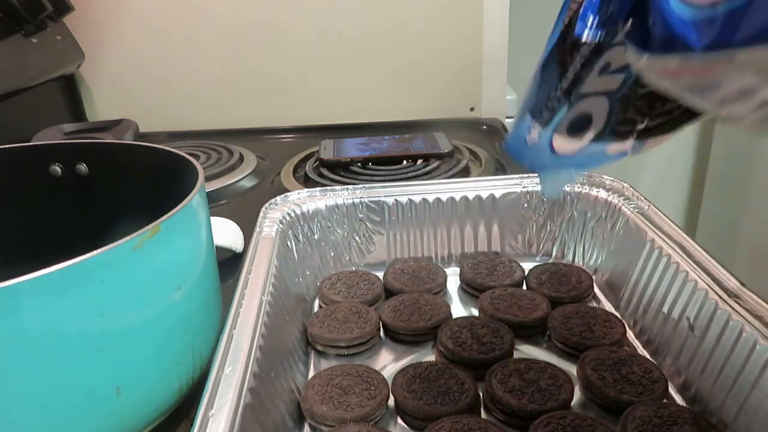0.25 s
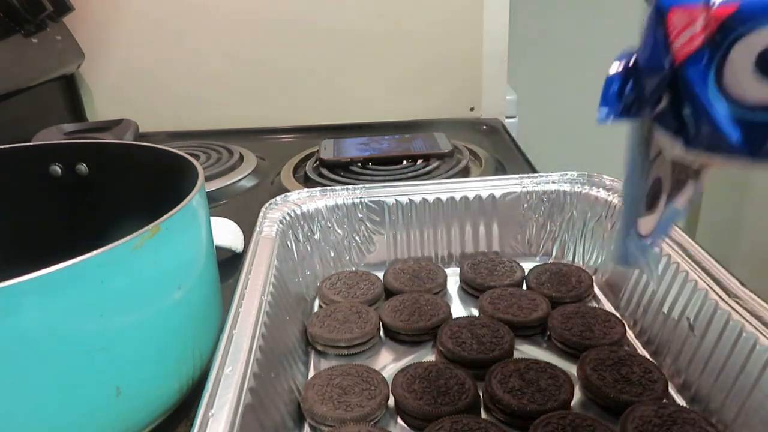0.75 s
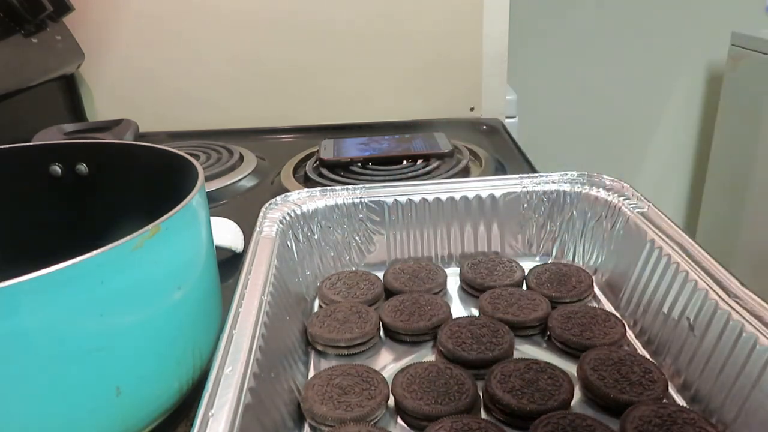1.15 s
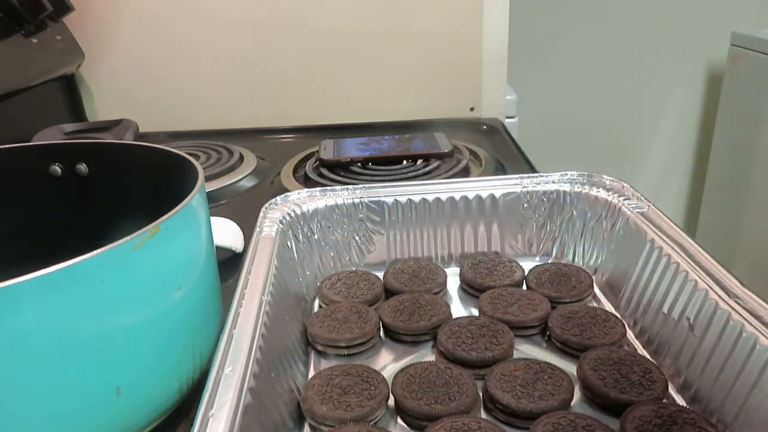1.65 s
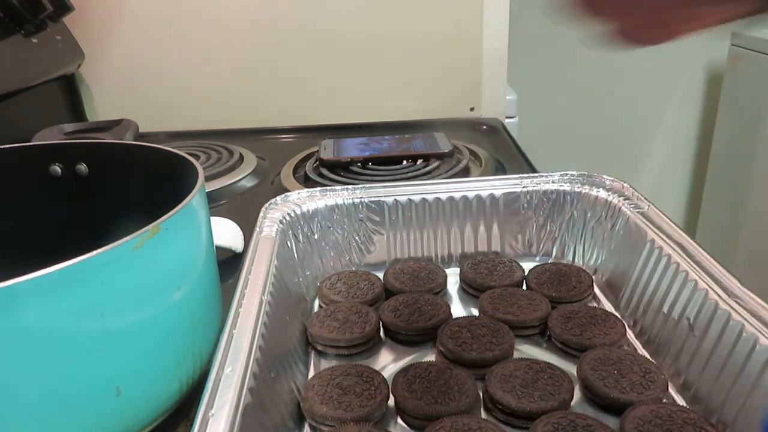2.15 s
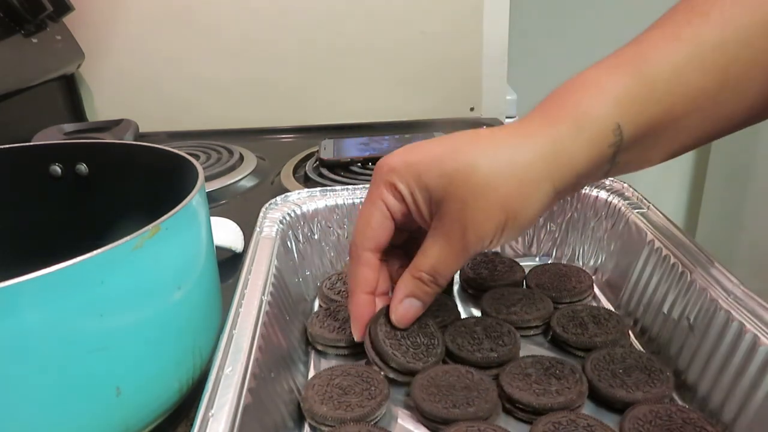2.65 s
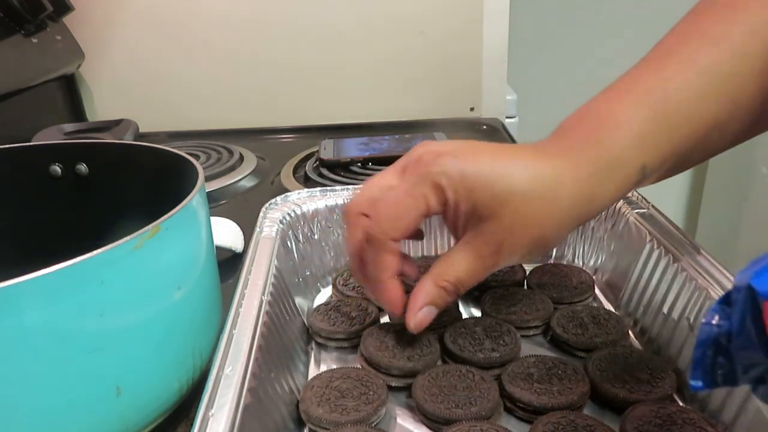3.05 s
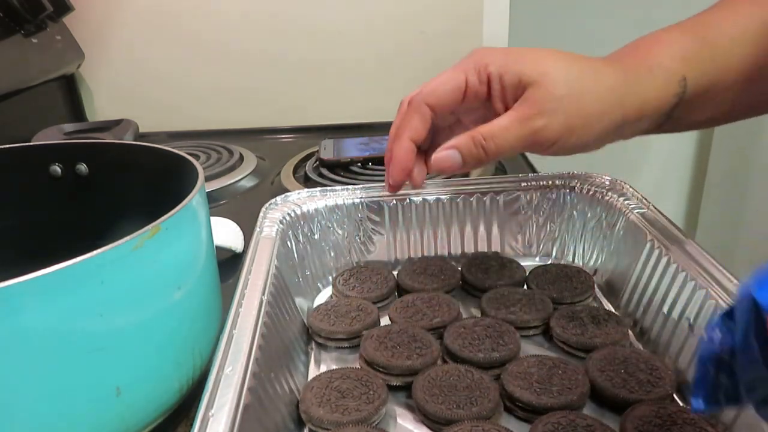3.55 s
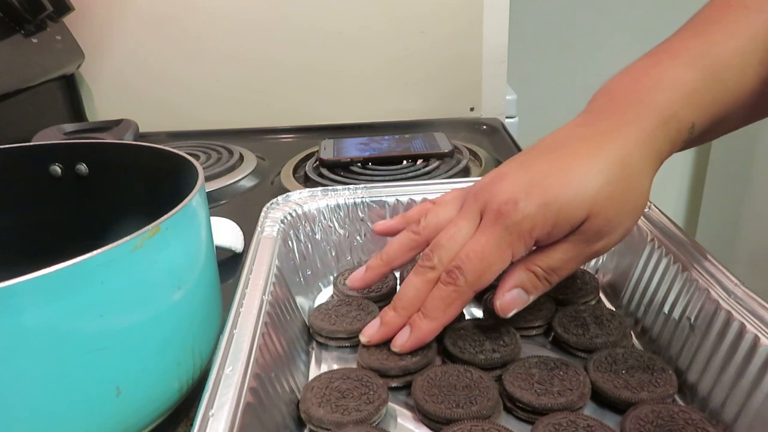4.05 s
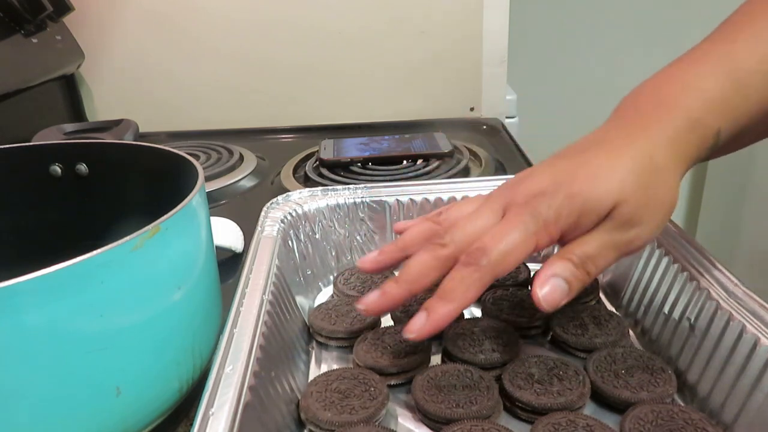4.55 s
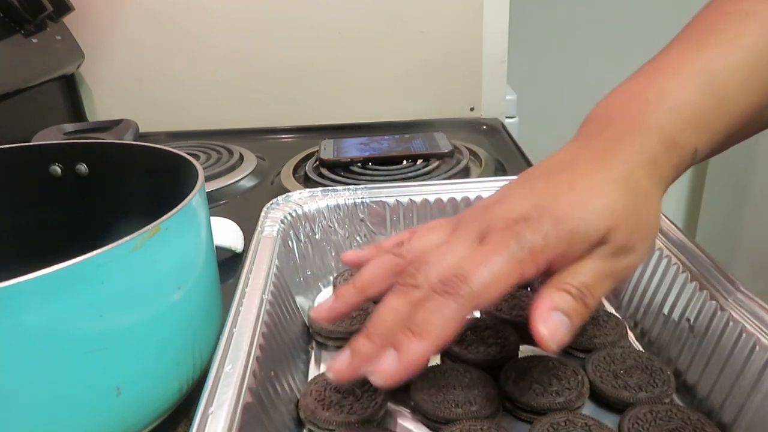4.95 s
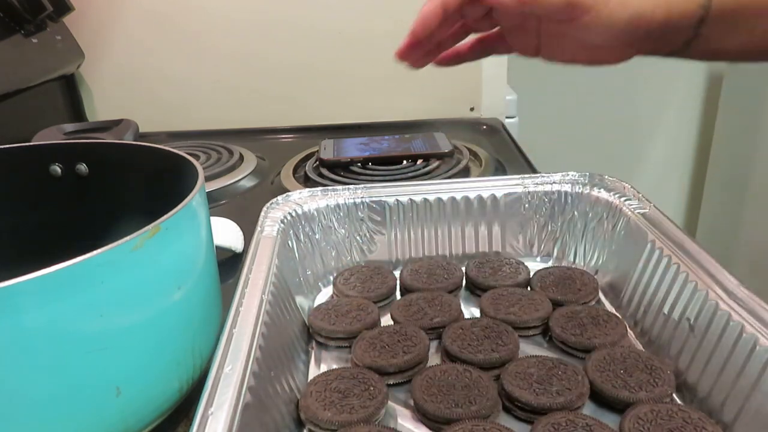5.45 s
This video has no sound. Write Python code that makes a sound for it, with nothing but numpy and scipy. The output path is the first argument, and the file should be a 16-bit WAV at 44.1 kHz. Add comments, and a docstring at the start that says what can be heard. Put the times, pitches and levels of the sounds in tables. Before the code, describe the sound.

A plastic wrapper crinkles and snaps loudly, then small hard cookies tap and scrape in a thin foil pan, with one strong slap.

```python
"""A plastic cookie package is crumpled and rummaged slightly to the right, then a hand sets cookies into a foil pan,
slides them and pats them down. Package: random clicks ring half-octave bands, plus single loud creases.
Pan: blows ring its modes under a foil rattle; drags are dense stick-slip clicks, partly through the same modes.
Dull bumps come through the counter; a short room and appliance rumble with hum and hiss lie behind."""
import sys
import numpy as np
from scipy import signal
from scipy.fft import rfft, irfft
from scipy.io import wavfile
from scipy.ndimage import uniform_filter1d

SR = 44100
rng = np.random.default_rng(int(sys.argv[2]) if len(sys.argv) > 2 else 0)


def materialize(psi):
    """Save the field psi as 16-bit PCM at rate SR to the path in sys.argv[1].

    A 1-D psi becomes a single channel; in a 2-D psi each row is a channel.
    """
    bounded = np.clip(np.atleast_2d(psi).T, -1, 1)
    quanta = np.round(bounded * 32767).astype(np.int16)
    wavfile.write(sys.argv[1], SR, quanta)


N = 252018

# handling of the package: time_s, crackle_gain_db, treble_over_crackle_db
CRUMPLE_ROWS = [(0.05, -64.5, -11), (0.33, -42, -6.5), (0.56, -52.5, -9.5), (0.72, -46.5, -17),
                (0.77, -39.5, -7), (0.9, -40.5, -10.5), (0.97, -28, -10.5), (1.09, -23, -8.5),
                (1.2, -30.5, -8), (1.28, -30.5, -10.5), (1.48, -22.5, -12), (1.6, -34, -11.5),
                (1.67, -27.5, -11), (1.74, -24.5, -11), (1.8, -32, -20), (1.9, -22, -16),
                (2.02, -25.5, -16.5), (2.13, -27, -18), (2.2, -34.5, -14.5), (2.37, -38.5, -15),
                (2.55, -63, -18)]
# film crackle spectrum: freq_hz, density_db_per_hz
FILM_SPECTRUM = [(120, -17), (200, -6.5), (538, -6), (601, -2), (671, -10.5), (735, 0), (851, -7),
                 (1210, -3), (2050, -2.5), (7270, -26), (13100, -16.5), (16000, -83)]
# single loud creases: start_s, ring_gain_db, ring_hz, treble_over_ring_db, shake_t60_s
CREASES = [(0.148, -39, 1360, -30, 0.035), (0.233, -35, 754, -17, 0.038), (0.264, -30.5, 1900, -28, 0.072),
           (0.316, -34, 2200, -17, 0.04), (0.345, -27, 1400, -26, 0.053), (0.352, -30, 650, -26, 0.045),
           (0.361, -25.5, 1620, -27, 0.2), (0.412, -26, 1650, -27, 0.043), (0.462, -35.5, 1450, -22, 0.15),
           (0.62, -38.5, 2800, -20, 0.05), (0.64, -33.5, 1810, -24, 0.035),
           (0.674, -24.5, 2300, -3.5, 0.027), (0.763, -32, 2830, 0, 0.021), (0.78, -30, 1900, -16, 0.03),
           (0.816, -32.5, 2700, -24, 0.11), (0.858, -20, 1770, -27, 0.019), (0.887, -20, 1330, -19, 0.018),
           (0.926, -24.5, 1810, -1.5, 0.041), (0.955, -17, 1860, -3, 0.031),
           (0.973, -11.5, 2210, -25, 0.04), (1.003, -28, 1980, -30, 0.041), (1.034, -9.5, 1540, -28, 0.03),
           (1.07, -14.5, 2300, -24, 0.076), (1.085, -15, 1680, -24, 0.054),
           (1.098, -12.5, 2400, -22, 0.071), (1.129, -16, 1290, -19, 0.035),
           (1.151, -9.5, 2460, -1.5, 0.016), (1.167, -17, 2500, -22, 0.03), (1.188, -18, 2120, -26, 0.015),
           (1.207, -5.5, 2530, -7, 0.005), (1.255, -14, 1150, -32, 0.027), (1.292, -27, 1530, 5.5, 0.051),
           (1.304, -16, 1800, -32, 0.051), (1.347, -16, 2050, -30, 0.047), (1.366, -13.5, 1580, -28, 0.038),
           (1.388, -9.5, 1530, -34, 0.027), (1.402, -8.5, 1290, -29, 0.059),
           (1.427, -9.5, 1430, -30, 0.071), (1.493, -8.5, 2140, -22, 0.098), (1.496, -9, 790, -30, 0.045),
           (1.538, -7.5, 1800, -19, 0.056), (1.583, -22, 1780, -26, 0.055),
           (1.607, -21.5, 1880, -27, 0.081), (1.631, -19.5, 1640, -21, 0.067),
           (1.68, -16.5, 1480, -29, 0.029), (1.697, -14, 1290, -32, 0.054),
           (1.735, -18.5, 2600, -22, 0.055), (1.778, -23, 1690, -28, 0.03), (1.815, -23, 1380, -24, 0.082),
           (1.831, -24, 2080, -28, 0.1), (1.862, -16, 1170, -30, 0.097), (1.877, -12.5, 1160, -14, 0.036),
           (1.901, -9, 2030, -3.5, 0.098), (1.914, -4.5, 1170, -33, 0.028),
           (1.972, -16.5, 1020, -27, 0.082), (1.997, -16.5, 970, -15, 0.064),
           (2.022, -18, 1200, -25, 0.045), (2.05, -19, 1040, -29, 0.05), (2.117, -13, 1590, -22, 0.034),
           (2.126, -13.5, 2900, 3, 0.074), (2.211, -21.5, 1500, -34, 0.084), (2.262, -27, 1530, -25, 0.058),
           (2.302, -19.5, 1240, -27.5, 0.21), (2.316, -20, 750, -30, 0.043), (2.36, -21, 940, -33, 0.16),
           (2.459, -29.5, 1010, -35, 0.063)]
CRUMPLE_TRIM_DB = -4.0
FLIP_AMP = 3.5  # crease flip, against rattle noise of RMS 1


def package():
    """Film creases buckle: dense crackle follows the hand, single creases flip and rattle, at two package ends."""
    gain_db, treble_db = curves(CRUMPLE_ROWS)
    gain = undb(gain_db + CRUMPLE_TRIM_DB)
    ends = np.zeros((2, N))
    for end in ends:
        _, mid, high = crackle(FILM_SPECTRUM, 110, 260, 2.3, 0.63, low_hz=0, high_hz=5000)
        end += gain * (unit(mid) + undb(treble_db) * unit(high))
    n = 3000
    for start_s, ring_db, ring_hz, treble_db, t60_s in CREASES:
        shake = rng.standard_normal(n) * fading(n, t60_s)
        shake[0] += FLIP_AMP  # the crease flips at once, the film rattles after
        ring = band(shake, ring_hz, 1.02 * ring_hz, order=2)
        tick = band(shake * fading(n, 0.0098), 9300, 10000)
        snap = crest(ring) + undb(treble_db) * crest(tick)
        add(ends[rng.integers(2)], start_s, undb(ring_db) * snap)
    return ends


# cookies and fingers landing in the pan: start_s, upper_gain_db, body_over_upper_db, treble_over_upper_db,
# rattle_t60_s, favoured_low_mode_hz, rise_s
LANDINGS = [(2.598, -7, -0.5, -32, 0.12, 396, 0.001), (2.76, -22, 5, -28, 0.03, 330, 0.0027),
            (2.774, -20, 4, -28, 0.04, 380, 0.003), (2.85, -22.5, -27, -4.5, 0.089, 330, 0.0012),
            (2.904, -11.5, -19, -10, 0.022, 430, 0.00097), (2.995, -27.5, -12, 3, 0.14, 322, 0.0014),
            (3.038, -9, 0.5, -24, 0.13, 440, 0.003), (3.047, -12, -1, -27, 0.11, 255, 0.001),
            (3.08, -20, -16, -26, 0.036, 476, 0.0018), (3.245, -15.5, 0, -18, 0.061, 397, 0.0054),
            (3.38, -14, -18, -32, 0.13, 393, 0.0076), (3.391, -12.5, 3.5, -33, 0.14, 382, 0.00073),
            (3.621, -34, -2, -24, 0.066, 315, 0.001), (3.978, -13, 3, -32, 0.03, 290, 0.006),
            (3.9926, 1, -9, -31, 0.07, 520, 0.00098), (4.132, -27, -25, -32, 0.078, 608, 0.0008),
            (4.537, -37.5, 3, -37, 0.14, 300, 0.0011), (4.871, -15, -11, -24.5, 0.14, 293, 0.0054),
            (4.884, -16.5, -5, -25, 0.05, 344, 0.00314), (5.001, -18, -1.5, -37.5, 0.21, 400, 0.0016),
            (5.065, -29, 7.5, -32, 0.098, 670, 0.0048), (5.107, -18, 1, -42, 0.093, 405, 0.0015),
            (5.176, -28, 4.5, -19, 0.21, 660, 0.0038), (5.218, -14.5, -1.5, -30, 0.32, 405, 0.001),
            (5.246, -21.5, 2.5, -26, 0.15, 396, 0.0028), (5.29, -28, 7, -11, 0.064, 660, 0.0033),
            (5.333, -15, 0, -47, 0.088, 400, 0.00117), (5.429, -21, -22, -18.5, 0.053, 620, 0.00075),
            (5.531, -25, -20, -23, 0.23, 570, 0.003), (5.594, -22, 5.5, -43, 0.089, 353, 0.00098),
            (5.689, -33, -22, -34, 0.15, 464, 0.002)]
# modes of the loaded pan, before damping or widening: mode_hz, gain_db, t60_s
PAN_MODES = [(256, -2, .08), (360, -2, .09), (405, 0, .14), (480, -6, .07), (580, -1, .09), (660, -3, .11),
             (760, -8, .06), (905, -6, .06), (1040, -5, .06), (1245, -4, .06), (1400, 0, .06),
             (1650, 0, .06), (1900, -5, .05), (2105, -1, .05), (2360, -5, .05), (2770, -13, .04),
             (3250, -17, .04)]
BRIGHT_HZ, BRIGHT_OCT_PER_DB = 1650, 0.08  # favoured upper pitch at 0 dB; softer blows are duller


def tapping():
    """Each landing is a blow that rings the pan's modes, a rattle of foil and a crack on top."""
    out, n = np.zeros(N), 6000
    pan_hz = np.array(PAN_MODES)[:, 0]
    deep = pan_hz < 700
    for start_s, upper_db, body_db, treble_db, t60_s, low_hz, rise_s in LANDINGS:
        contact = 1 - np.exp(-np.arange(1, n + 1) / SR / max(rise_s, 1e-4))  # a soft landing builds up
        high_hz = BRIGHT_HZ * 2 ** (BRIGHT_OCT_PER_DB * upper_db)
        blow = 0.35 * rng.standard_normal(n) * fading(n, 0.13 * t60_s) * contact
        blow[int(rise_s * SR)] += 3.0
        blow = band(blow, 800, 1330)

        # the spot struck favours the modes near two pitches
        octaves_off = abs(np.log2(pan_hz / np.where(deep, low_hz, high_hz)))
        loss_db_per_oct = np.where(deep, 32, 7)
        spot_db = -octaves_off * loss_db_per_oct + 2.3 * rng.standard_normal(len(PAN_MODES))
        modes = []
        for mode_spot_db, (hz, mode_db, mode_t60_s) in zip(spot_db, PAN_MODES):
            ring = unit(band(blow, hz, np.log(1000) / np.pi / mode_t60_s))
            modes.append(rng.choice([-1, 1]) * undb(mode_db + mode_spot_db) * ring)
        modes = np.array(modes) * fading(n, 5.5 * t60_s)  # the resting hand damps the ring
        body = modes[deep].sum(axis=0)

        rattle = band(rng.standard_normal(n) * fading(n, t60_s) * contact, high_hz, 1110, order=2)
        upper = unit(modes[~deep].sum(axis=0)) + 1.32 * unit(rattle)
        crack = band(rng.standard_normal(n) * fading(n, 0.47 * t60_s) * contact, 3700, 9000)
        tap = crest(upper) + undb(body_db) * crest(body) + undb(treble_db) * crest(crack)
        add(out, start_s, undb(upper_db) * tap)
    return out


# cookies dragged over foil: loudest_s, gain_db, swell_db_per_s, fade_db_per_s, body_gain_db, treble_gain_db,
# rustle_gain_db (the last three on top of gain_db)
DRAGS = [(2.63, -26.5, 900, 124, 0, -32, -29), (2.74, -21.5, 249, 172, -8.5, -28, -18),
         (2.9, -23, 154, 168, -3, -22, -15.5), (3.084, -20.5, 355, 279, -9, -30, -19),
         (3.273, -25, 700, 362, -3.5, -27, -27), (3.425, -36.5, 174, 600, -15, -32, -32),
         (3.5, -45, 106, 118, -8, -31, -19), (4.033, -30.5, 900, 175, -8, -37, -20),
         (4.14, -46.5, 903, 76.5, -7, -30, -17), (4.2, -36, 158, 241, -6, -22, -14),
         (4.902, -25.5, 900, 286, -10, -27, -34), (4.974, -36.5, 211, 254, 1, -26, -18),
         (5.1, -42.5, 200, 10.5, -6, -33, -9.5), (5.23, -41, 154, 106, 1, -19.5, -5),
         (5.36, -48.5, 80, 64, 6, -40, -23)]
# scrape spectrum: freq_hz, density_db_per_hz
RASP_SPECTRUM = [(88, -36), (150, -2), (231, -22), (321, 16), (466, 18.5), (545, -14), (637, 1), (821, -4),
                 (1870, -4.5), (4490, -32), (11000, -30), (16000, -44)]


def pan_ring(slips, deep):
    """Pan modes below (deep) or above 620 Hz, rung by slips with widened, shorter resonances."""
    modes = [row for row in PAN_MODES if (row[0] < 620) == deep]
    return unit(sum(undb(db) * unit(band(slips, hz, 6.4 / t60_s)) for hz, db, t60_s in modes))


def scraping():
    """Stick and slip of crumbs on foil: dense clicks, part of them ringing the pan, at two places."""
    out, t = np.zeros((2, N)), np.arange(N) / SR
    for place in out:
        low, mid, high = map(unit, crackle(RASP_SPECTRUM, 440, 1500, 3.7, 0.44, low_hz=600, high_hz=4200))
        slips = band(clicks(1200, 4.2), 990, 1230)
        body, ring = pan_ring(slips, True), pan_ring(slips, False)
        rustle = unit(band(slips, 2790, 770, order=2))
        for loudest_s, gain_db, swell, fade, body_db, treble_db, rustle_db in DRAGS:
            # speeds up, then slows down
            drop_db = np.where(t < loudest_s, swell * (loudest_s - t), fade * (t - loudest_s))
            mix = 0.67 * mid + 0.15 * ring
            mix += undb(body_db) * (0.57 * low + 0.27 * body)
            mix += undb(treble_db) * high + undb(rustle_db) * rustle
            place += undb(gain_db - drop_db) * mix
    return out


# dull bumps through the counter: start_s, gain_db, pitch_hz, t60_s
BUMPS = [(0.714, -30.5, 94, 0.47), (1.302, -30, 105, 0.11), (2.112, -9, 133, 0.065),
         (2.386, -29, 110, 0.15), (3.366, -25, 105, 0.19), (3.715, -35, 87, 0.068), (3.9915, 4, 250, 0.02)]


def bumping():
    """Soft blows: a low ring that starts gently and decays exponentially."""
    out, t = np.zeros(N), np.arange(9000) / SR
    for start_s, gain_db, pitch_hz, t60_s in BUMPS:
        onset = 1 - np.exp(-t / 0.0029)
        thud = np.sin(2 * np.pi * pitch_hz * t) * onset * fading(len(t), t60_s)
        add(out, start_s, undb(gain_db) * thud)
    return out


ROOM_GAIN_DB, ROOM_T60_S = -10, 0.095  # t60 of the echo noise


def room(x):
    """Short diffuse reverberation: decaying noise, treble softened, convolved with the sources."""
    n = 16000
    echo = diffuse(n) * fading(n, ROOM_T60_S)
    echo[:, :120] = 0  # the first reflection comes after 2.7 ms
    energy = np.sum(echo ** 2) / 2
    echo = signal.lfilter([1], [1, -.4], echo) / np.sqrt(energy)
    return undb(ROOM_GAIN_DB) * signal.fftconvolve(x[None], echo, axes=1)[:, :N]


# level of the whole background over time: time_s, rumble_db
BACKGROUND_LEVEL = [(0.0, -47), (0.81, -38.5), (1.57, -39.5), (2.04, -32), (2.43, -37), (2.72, -35.5),
                    (3.42, -36.5), (3.86, -37), (4.05, -41.5), (4.3, -46.5), (5.18, -38), (5.71, -37)]
# appliance rumble: freq_hz, density_db_per_hz
RUMBLE_SPECTRUM = [(12, -44), (20, -24), (43, -5), (107, 0.5), (140, -4), (160, 1), (189, -9.5), (248, -6),
                   (319, -9), (353, -22.5), (400, -15), (520, -37), (880, -120)]
# broad hiss: freq_hz, density_db_per_hz
HISS_SPECTRUM = [(150, -17), (250, -9.5), (367, -9), (452, -9), (802, -9.5), (1010, -17.5), (1280, -15),
                 (1610, -20.5), (4650, -34), (16000, -52.5)]
HUM_HZ, HUM_OVER_RUMBLE_DB = 59.7, -11.5
HISS_DB, HISS_DB_PER_RUMBLE_DB = -44, 0.93  # HISS_DB holds at -39 dB rumble


def kitchen():
    """Appliance rumble as shaped noise with a sine of mains hum, and broad hiss, on one level curve."""
    rumble_db, = curves(BACKGROUND_LEVEL)
    hum = undb(HUM_OVER_RUMBLE_DB) * np.sqrt(2) * np.sin(2 * np.pi * HUM_HZ * np.arange(N) / SR)
    rumble = unit(colour(diffuse(N), RUMBLE_SPECTRUM)) + hum
    hiss_db = HISS_DB + HISS_DB_PER_RUMBLE_DB * (rumble_db + 39)
    return undb(rumble_db) * rumble + undb(hiss_db) * unit(colour(diffuse(N), HISS_SPECTRUM))


# stereo width of diffuse sound: freq_hz, side_minus_mid_db
SIDE_SPECTRUM = [(60, -43), (110, -24.5), (200, -19), (380, -9), (700, -18), (1290, -14.5), (2380, -10.5),
                 (4400, 2), (8120, -1), (15000, 3)]


def diffuse(n):
    """Noise from all round: alike at both ports in the bass, unlike in the treble."""
    mid, side = rng.standard_normal((2, n))
    return mid + colour(side, SIDE_SPECTRUM) * np.array([[1], [-1]])


def crackle(spectrum, wide_per_s, own_per_s, scatter_db, wide_share, low_hz, high_hz):
    """Buckling creases: some click over all bands, others ring one band only; returns low, middle and treble."""
    wide, parts = unit(clicks(wide_per_s, scatter_db)), np.zeros((3, N))
    for hz in 180 * 2 ** np.arange(0, 6.6, .5):
        own = unit(clicks(own_per_s * np.sqrt(hz / 1000), scatter_db))
        strike = wide_share * wide + own
        # clicks come in clumps, each band on its own
        steps = np.repeat(rng.standard_normal(N // 500 + 1), 500)
        clump_db = 2.5 * unit(uniform_filter1d(steps, size=500))[:N]
        ring = unit(band(strike * undb(clump_db), hz, 0.71 * hz, order=3))
        part = int(hz > low_hz) + int(hz > high_hz)
        parts[part] += undb(at_hz(spectrum, hz)) * np.sqrt(hz) * ring
    return parts


def clicks(rate_per_s, scatter_db):
    """Impulses at random moments; most are small, a few large."""
    draw = rng.random((3, N))
    size_db = np.minimum(-scatter_db * np.log(1 - draw[2]), 14)
    return (draw[0] < rate_per_s / SR) * np.sign(draw[1] - .5) * undb(size_db)


def band(x, hz, width_hz, order=1):
    """Resonance with gain 1 at the centre; a higher order gives steeper skirts."""
    for _ in range(order):
        x = signal.lfilter(*signal.iirpeak(min(hz, .45 * SR), hz / width_hz, fs=SR), x)
    return x


def colour(x, spectrum):
    """Shape by a spectrum."""
    n = x.shape[-1]
    return irfft(rfft(x) * undb(at_hz(spectrum, np.fft.rfftfreq(n, 1 / SR))), n)


def at_hz(spectrum, hz):
    """Read (Hz, dB) points on a log-frequency axis."""
    f, db = np.transpose(spectrum)
    return np.interp(np.log(np.maximum(hz, 1)), np.log(f), db)


def curves(rows, outside_db=-120):
    """Columns of (s, ..) rows at every sample; the first is silent outside the rows."""
    s, *columns = np.transpose(rows)
    t = np.arange(N) / SR
    out = [np.interp(t, s, c) for c in columns]
    out[0][(t < s[0]) | (t > s[-1])] = outside_db
    return out


def fading(n, t60_s):
    """Exponential decay, 60 dB in t60_s."""
    return np.exp(-np.log(1000) * np.arange(n) / SR / t60_s)


def crest(x):
    """Scale a burst so that its strongest few milliseconds swing to about 1."""
    return x / np.sqrt(3.05 * uniform_filter1d(x ** 2, size=128).max())


def undb(db):
    """Decibels to amplitude."""
    return 10 ** (np.asarray(db) / 20)


def unit(x):
    """Scale to RMS 1."""
    return x / np.sqrt(np.mean(x ** 2))


def add(out, start_s, x):
    """Mix a burst in at start_s."""
    i = int(start_s * SR)
    out[i:i + len(x)] += x[:len(out) - i]


def ports(x, left_lag_samples, left_over_right_db):
    """Two microphone ports: the left hears the sound left_lag_samples later."""
    late = irfft(rfft(x) * np.exp(-2j * np.pi * np.fft.rfftfreq(N) * left_lag_samples), N)
    return np.array([late * undb(left_over_right_db / 2), x * undb(-left_over_right_db / 2)])


def scene():
    """Place package, pan and drags in stereo; add bumps, room and kitchen."""
    film, rasp, taps = package(), scraping(), tapping()
    direct = ports(film[0], 1.0, -1.1) + ports(film[1], 1.26, 0.13)
    direct += ports(taps, -0.74, 0.16)
    direct += ports(rasp[0], -0.6, 0.18) + ports(rasp[1], 0.36, .2)
    sources = film.sum(axis=0) + rasp.sum(axis=0) + taps
    return direct + bumping() + room(sources) + kitchen()


TOP_HZ = 16000


def record(dry):
    """The loudest peaks are rounded off and the top is cut."""
    soft = np.tanh(abs(dry) ** 3) ** (1 / 3) * np.sign(dry)
    return signal.sosfilt(signal.ellip(8, .2, 70, TOP_HZ, fs=SR, output="sos"), soft)


dry = scene()
out = record(dry)
materialize(out)
```